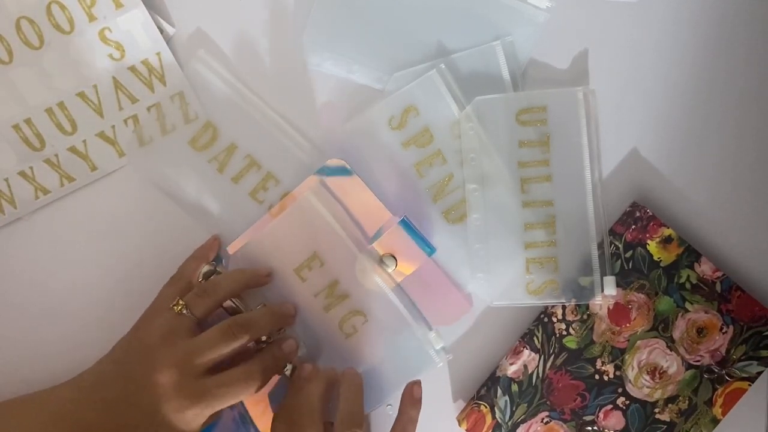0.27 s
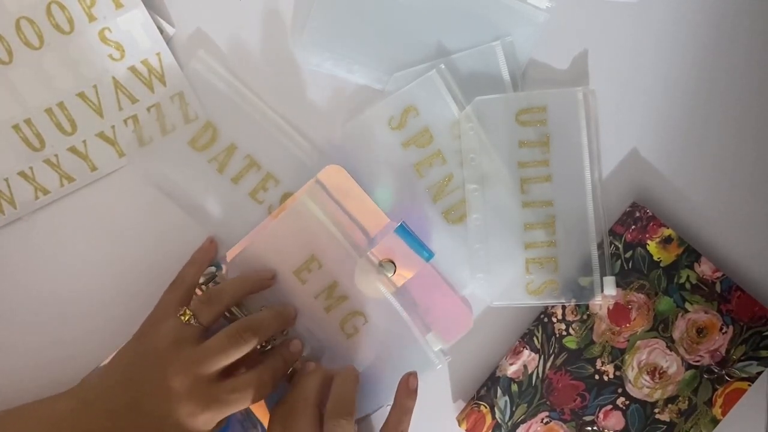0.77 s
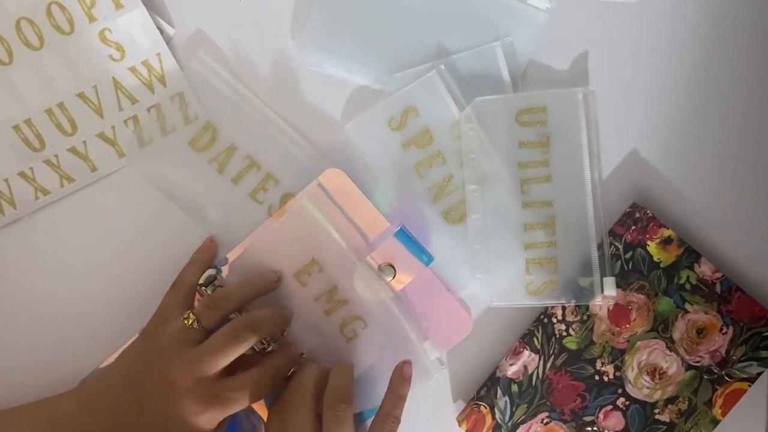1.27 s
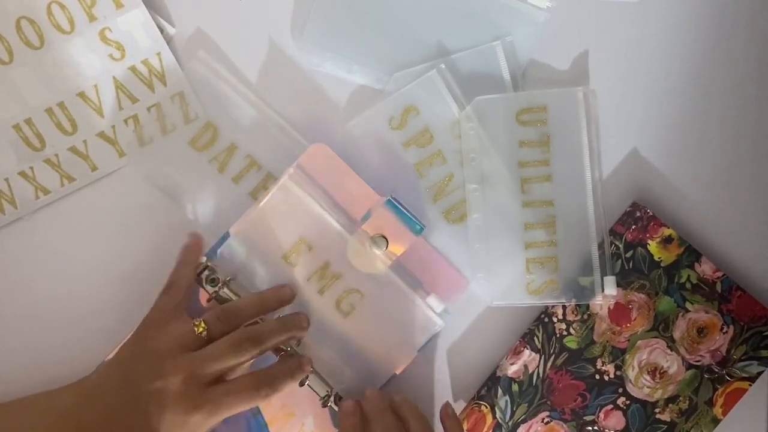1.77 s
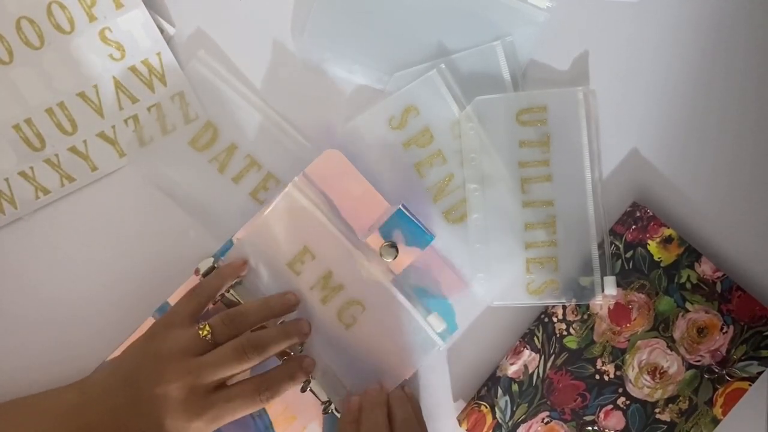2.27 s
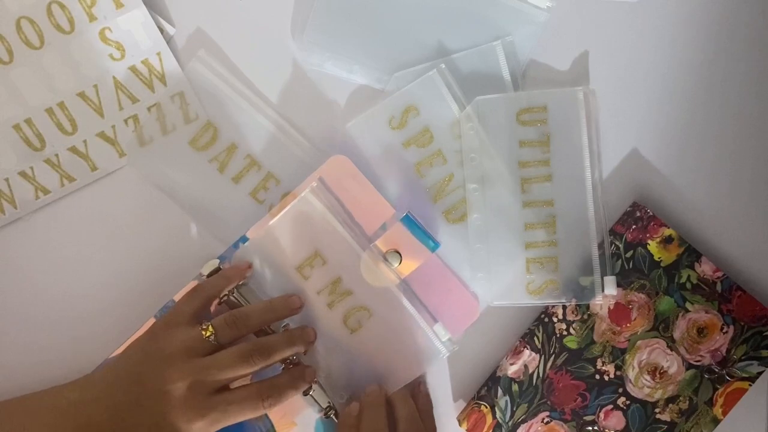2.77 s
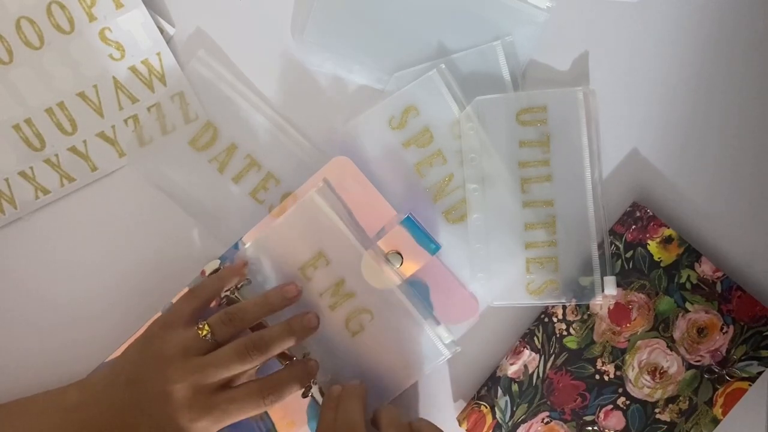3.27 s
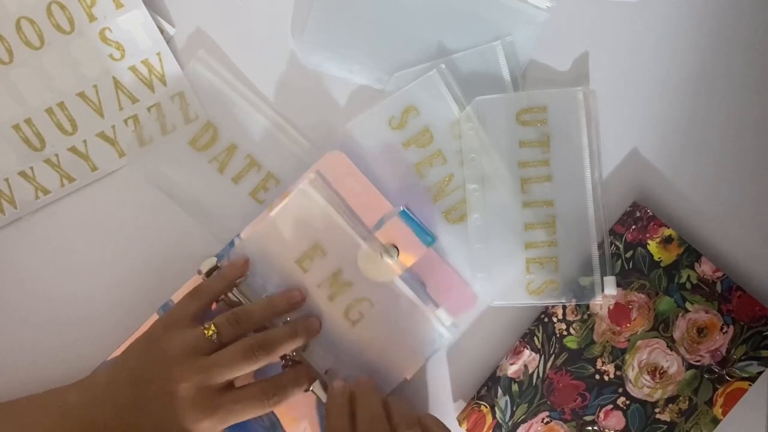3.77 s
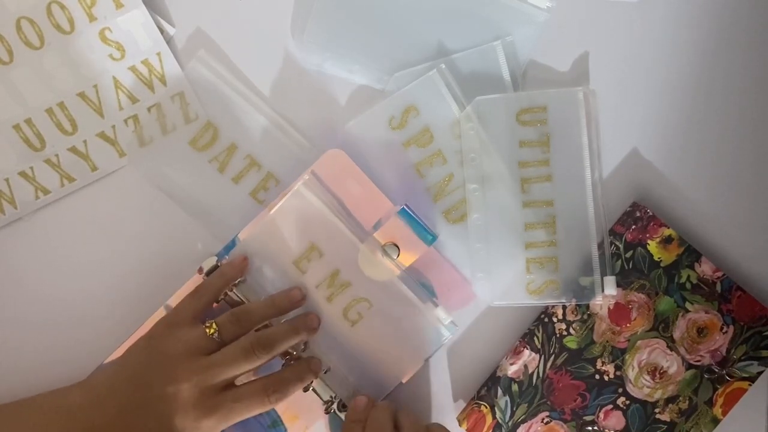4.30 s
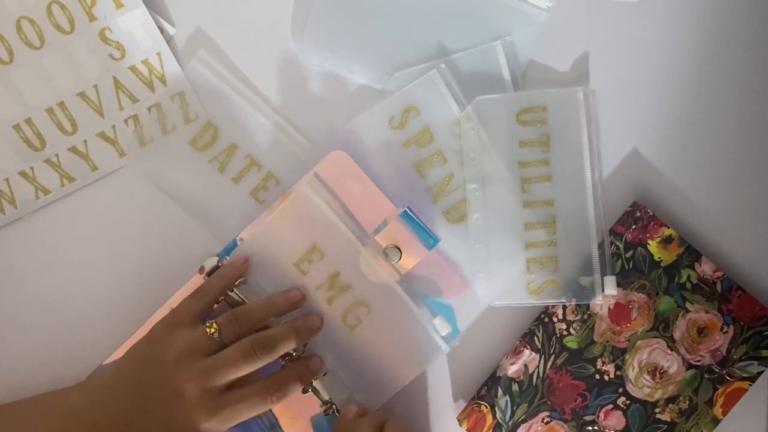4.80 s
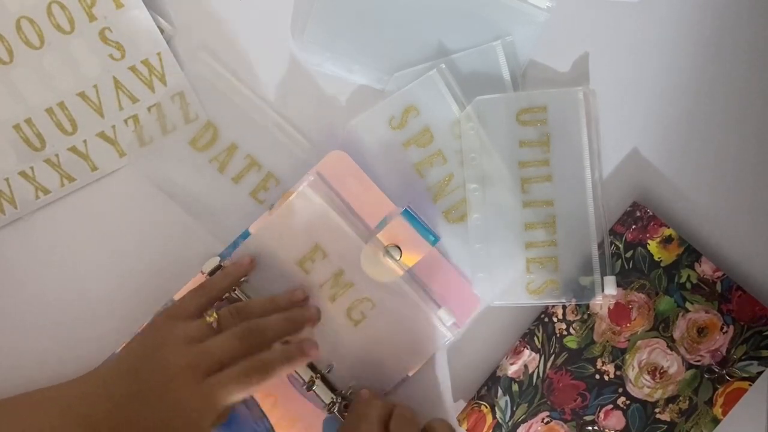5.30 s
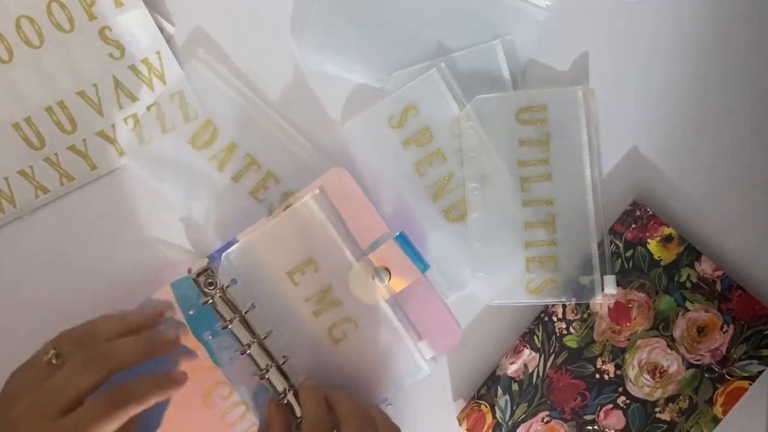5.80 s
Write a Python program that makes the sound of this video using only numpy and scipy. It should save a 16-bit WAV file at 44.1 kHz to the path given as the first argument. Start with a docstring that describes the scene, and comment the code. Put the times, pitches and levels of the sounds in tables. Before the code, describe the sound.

Very close, dry handling of stiff clear plastic on metal binder rings over a table, indoors. Small clicks and a stuttering creak build to one hard, bright clack that jolts the cover and table. A dense burst of crinkling ticks follows, then sparse rustles and taps, a gentler snap, near-quiet, and finally clustered ticks with rough edge scrapes. Low room hum stays underneath.

```python
"""A quiet room with a low wavering hum, and a close two-port microphone by a small binder on a table.
Hands fit clear plastic envelopes onto its metal rings: first come ticks, a dragging creak and harder slips.
At 1.15 s the rings snap shut loudly, cover and table knock, and the binder drops back; sheets rustle and tick.
A softer snap follows at 3.44 s, then taps and hoarse edge scrapes from 4.6 s until about 6.1 s.
Filtered noise makes the rubbing and cracks, decaying modes the binder, and short sines the sheet edges."""
import sys
import numpy as np
from scipy import signal
from scipy.fft import rfft, irfft, next_fast_len
from scipy.io import wavfile
from scipy.ndimage import uniform_filter1d

SR = 44100
rng = np.random.default_rng(int(sys.argv[2]) if len(sys.argv) > 2 else 0)


def to_wav(s):
    """Save 16-bit WAV."""
    ch = np.atleast_2d(s).T  # columns
    pcm = np.round(np.clip(ch, -1, 1) * 32767)  # PCM
    wavfile.write(sys.argv[1], SR, pcm.astype(np.int16))


N = 266805
TIME = np.arange(N) / SR
BLOW_TIME = TIME[:SR // 6]  # the span of one contact sound


def undb(db):
    """Decibels to gain."""
    return 10 ** (np.asarray(db) / 20)


def unit(x):
    """Scale to rms 1."""
    return x / np.sqrt(np.mean(x ** 2))


def unit_peak(x, size=132):
    """Scale so that the loudest 3 ms have rms 1."""
    return x / np.sqrt(uniform_filter1d(x ** 2, size, mode="constant").max())


def t60_decay(age, t60_s):
    """Exponential decay that falls by 60 dB in t60_s."""
    return np.exp(-np.log(1000) * age / t60_s)


def blow_noise():
    """A fresh stretch of random force, as long as one contact sound."""
    return rng.standard_normal(len(BLOW_TIME))


def log_curve(points, hz):
    """Read (Hz, value) points on a log-frequency axis."""
    point_hz, value = np.transpose(points)
    return np.interp(np.log(hz + 1), np.log(point_hz), value)


def colour(x, points):
    """Causal minimum-phase filter with the given (Hz, dB) response."""
    log_gain = log_curve(points, np.fft.rfftfreq(2048, 1 / SR)) * np.log(10) / 20
    cepstrum = irfft(log_gain)
    # fold the cepstrum onto positive time, so the filter does not sound early
    cepstrum[1:1024] *= 2
    cepstrum[1025:] = 0
    response = irfft(np.exp(rfft(cepstrum)))
    return signal.fftconvolve(x, response)[:len(x)]


def band(x, lo_hz, hi_hz, order=3):
    """Causal band-pass."""
    edges_hz = [lo_hz, min(hi_hz, .45 * SR)]
    return signal.sosfilt(signal.butter(order, edges_hz, "band", fs=SR, output="sos"), x)


def walk(rate):
    """Slow chance with a spread near 1, from about rate random steps per second."""
    k = int(SR / rate)
    steps = np.repeat(rng.standard_normal(N // k + 1), k)
    return unit(uniform_filter1d(uniform_filter1d(steps, k), k)[:N])


def add(out, s, x):
    """Mix a sound in at time s."""
    i = max(int(s * SR), 0)
    out[i:i + len(x)] += x[:max(N - i, 0)]


# colour of the room noise: pitch_hz, level_db
ROOM_COLOUR = [(10, -32), (25, -21), (42, -14), (65, -6), (90, -6.5), (130, -9.5), (200, -12.5), (300, -24),
               (500, -30), (900, -34), (1500, -39.5), (3000, -45), (6000, -54), (15500, -63)]


def background(rumble_db=-61.5, side_db=-23, hum_hz=63.0, hum_db=-63):
    """Low room noise with a wavering hum; only the bass is alike on both sides."""
    mid = unit(colour(rng.standard_normal(N), ROOM_COLOUR)) * undb(rumble_db + 1.2 * walk(6.0))
    side = unit(colour(rng.standard_normal(N), ROOM_COLOUR))
    side = colour(side, [(150, side_db), (500, 1), (2000, 0.5)]) * undb(rumble_db)
    phase = 2 * np.pi * np.cumsum(hum_hz * (1 + 0.03 * walk(7))) / SR
    waver_db = 2.5 * walk(7)
    hum = undb(hum_db + waver_db) * unit(np.sin(phase) + 0.74 * np.sin(2 * phase))
    return mid + hum + np.array([side, -side])


def room(x, early_db=-18, early_t60=0.1, late_db=-24, late_t60=0.19):
    """Table and near objects scatter first; a longer, quieter tail from the walls follows."""
    t = TIME[:SR // 2]
    onset = np.clip((t - .002) / 0.0035, 0, 1)
    reflection_colour = [(110, -10.0), (300, 7.0), (650, 10.5), (1500, 12.5), (5000, 7.0), (13000, 3)]
    out = []
    for early, late in rng.standard_normal((2, 2, len(t))):
        early = early * onset * t60_decay(t, early_t60)
        late = late * onset * t60_decay(t, late_t60)
        response = undb(early_db) * early / np.linalg.norm(early)
        response = response + undb(late_db) * late / np.linalg.norm(late)
        out.append(signal.fftconvolve(x, colour(response, reflection_colour))[:N])
    return np.array(out)


# phase by which the left microphone port leads: pitch_hz, lead_radians
PORT_PHASE = [(0, 0), (550, -.15), (800, .9), (1100, -.4), (1750, -.5), (2400, .5), (3000, 2.1),
              (4200, 1.1), (5600, .4), (6200, .9), (7800, 3.1), (8400, 3.2), (11000, 6.2), (11900, 6.4),
              (13200, 7.8), (14000, 9.3), (16000, 9.5)]
# left port minus right port: pitch_hz, level_db
PORT_BALANCE = [(80, -.4), (300, -2.4), (600, -3), (800, -5), (1300, 0), (2400, -3), (4400, -1), (6000, 1),
                (9000, 0)]


def ports(x):
    """The two microphone ports hear one source with unequal phase and level."""
    size = next_fast_len(N + SR // 4)
    hz = np.fft.rfftfreq(size, 1 / SR)
    phase = np.interp(hz, *np.transpose(PORT_PHASE))
    # each port takes half of the difference
    half = np.exp(.5j * phase) * undb(log_curve(PORT_BALANCE, hz) / 2)
    return irfft(rfft(x, size) * np.array([half, 1 / half]), size)[:, :N]


# binder on the table, seven cover modes and then the ring spine: pitch_hz, level_db, t60_s
MODES = [(170, -17, 0.22), (251, -11, 0.1), (299.6, 2, 0.11), (452.9, 1, 0.06), (503, -8, 0.015),
         (640, -8, 0.075), (833, -9.5, 0.038), (974, -13.5, .07), (1107, -17, 0.035), (1186, -18.5, 0.027),
         (1445, -3, .052), (1570, -16, .05), (1654, -11.5, 0.04), (1792, -10, 0.041), (1899, -13, 0.04),
         (2266, -9, 0.045), (2450, -5.5, 0.018), (2970, -10.5, 0.024), (4100, -13, 0.037),
         (5240, -10, 0.025), (5700, -14, 0.028)]


def binder(modes, detune, spread_db, travel_s):
    """Modes after one blow; bending waves are slower at low pitch, so the thump comes late."""
    hz, db, t60 = np.transpose(modes)[:, :, None]
    pitch, size = rng.standard_normal((2, len(modes), 1))
    # travel_s is the delay of the first mode given
    age = np.maximum(BLOW_TIME - travel_s * np.sqrt(hz[0] / hz), 0)
    ringing = np.sin(2 * np.pi * hz * (1 + detune * pitch) * age) * t60_decay(age, t60)
    return -np.sum(undb(db + spread_db * size) * ringing, axis=0)


# colour of surfaces striking close to the microphone: pitch_hz, level_db
CRACK = [(200, -24.5), (900, -10.5), (1500, 3), (2300, -6), (3200, 0.5), (4200, 1.5), (5500, -5),
         (6500, -10), (7600, -7.5), (10000, -10.5), (13000, -10), (15700, -16.5)]


def contact(decay_s, chatter, rise_s=.0003):
    """A push followed by brief chatter of the two surfaces."""
    swell = (1 - np.exp(-BLOW_TIME / rise_s)) * np.exp(-BLOW_TIME / decay_s)
    push = chatter * blow_noise() * swell
    push[0] += 1
    return colour(push, CRACK)


SETTLE_S, SETTLE_DB = 1.2245, -40


def settle(lo_hz=200, hi_hz=380, decay_s=.008):
    """The binder drops back on the table after the hard snap."""
    out = np.zeros(N)
    knock = binder(MODES[:7], 0, 0, travel_s=0.0015) * np.exp(-BLOW_TIME / decay_s)
    thud = band(knock, lo_hz, hi_hz, order=1)
    add(out, SETTLE_S, undb(SETTLE_DB) * unit_peak(thud))
    return out


# a taut sheet edge scraping along, its pitch moving as it bends:
# start_s, length_s, first_pitch_hz, last_pitch_hz, level_db
EDGE_SCRAPES = [(1.478, .075, 1400, 1786, -52), (2.578, .15, 1400, 2300, -70.5),
                (3.633, 0.081, 1350, 1657, -57.5), (5.334, 0.046, 3500, 3300, -50.5),
                (5.554, .09, 3000, 2100, -65.5), (5.676, 0.0513, 4400, 4770, -71),
                (5.774, 0.13, 6560, 6880, -58), (6.014, 0.047, 3200, 2860, -59)]


def edge_scrapes(width_hz=750, rough_db=2):
    """One broad resonance of the bent sheet, fed by friction, swells and glides with each scrape."""
    out = np.zeros(N)
    friction = rng.standard_normal(N) + 1j * rng.standard_normal(N)
    lowpass = signal.butter(2, width_hz / 2, fs=SR, output="sos")
    wobble = signal.sosfilt(lowpass, friction) * undb(rough_db * walk(90))
    for start, length, first_hz, last_hz, db in EDGE_SCRAPES:
        span = (TIME > start) & (TIME < start + length)
        share = (TIME[span] - start) / length
        phase = 2 * np.pi * np.cumsum(first_hz * (last_hz / first_hz) ** share) / SR
        song = unit(np.real(wobble[span] * np.exp(1j * phase)))
        add(out, start, undb(db) * song * np.sqrt(np.sin(np.pi * share)))
    return out


def slip(lo_hz, body_hz, tick_hz, tick_db, release_db=-10):
    """One jerk: a tiny sharp click as the sheet lets go, then a dull tick that knocks the binder."""
    body = binder(MODES, detune=0.033, spread_db=.5, travel_s=0.0011) * np.exp(-BLOW_TIME / 0.045)
    body = band(band(body, lo_hz, body_hz, order=1), 150, 3600)
    tick = band(contact(decay_s=0.0027, chatter=0.94), 450, tick_hz, order=2)
    release = band(contact(decay_s=.0004, chatter=1.0), 1300, 6000, order=2)
    return unit_peak(body) + undb(tick_db) * unit_peak(tick) + undb(release_db) * unit_peak(release)


# single harder slips as the rings are squeezed: start_s, level_db
SLIPS = [(.377, -65), (0.391, -58.5), (0.9143, -50.5), (.943, -49.5), (1.034, -45), (1.0801, -43.5)]
# a sheet dragged by jerks along a ring, one curve for each pull: time_s, slips_per_s, level_db
CREAKS = [
    [(.453, 66.6, -60), (0.528, 44.5, -55), (0.555, 85, -54), (0.616, 97, -52), (0.679, 57, -50)],
    [(1.479, 130, -46), (1.51, 165, -48.5), (1.553, 117, -48.5)],
]


def creak(scatter_db=1.3, note_hz=2350, note_db=-6, note_s=0.0035):
    """Stick and slip: runs of uneven little jerks, and a few harder single ones."""
    out = np.zeros(N)
    for s, db in SLIPS:
        # a hard slip also sets the squeezed ring sounding for a moment
        note = band(contact(decay_s=note_s, chatter=.5), note_hz / 1.12, note_hz * 1.12, order=2)
        jerk = slip(lo_hz=514, body_hz=1310, tick_hz=1800, tick_db=-6.5, release_db=-17)
        add(out, s, undb(db + note_db) * unit_peak(note))
        add(out, s, undb(db) * jerk)
    for pull in CREAKS:
        times, rates, levels = np.transpose(pull)
        s = times[0]
        while s < times[-1]:
            size = undb(np.interp(s, times, levels) + scatter_db * rng.standard_normal())
            jerk = slip(lo_hz=366, body_hz=820, tick_hz=960, tick_db=-5.5, release_db=-11.5)
            add(out, s, size * jerk)
            s += np.exp(.03 * rng.standard_normal()) / np.interp(s, times, rates)
    return out


def bent(x, spread_db):
    """The sheet is bent differently every time, which moves its resonances."""
    hz = np.geomspace(700, 15000, 56)
    return colour(x, np.column_stack([hz, spread_db * rng.standard_normal(len(hz))]))


STROKE_EASE_DB = 10.5  # a stroke is this much softer at its ends than at its fastest


def stroke_speed(share, gather):
    """Each stroke gathers speed and slows down again; share is how much of it has passed."""
    slowness = np.interp(share, [0, np.clip(gather, .02, .98), 1], [1, 0, 1])
    return undb(-STROKE_EASE_DB * slowness ** 2)


# strokes of sheet over sheet: start_s, length_s, gather (share of the length spent gathering speed),
# strength_db, brightness_db, rub_db (cover rub over the stroke), crinkle_db (crinkles over the stroke)
STROKES = [(0.534, 0.43, 0.38, -70.5, -1, 0.5, 4), (1.269, 0.17, 0.25, -60, -2.5, 0, 6),
           (1.47, 0.083, 1, -45.5, -1.5, -1.5, -2), (1.575, 0.069, 0.11, -47, -4.5, 3, 0),
           (1.66, 0.19, .06, -76, 2.5, 4.5, 6), (1.889, 0.073, 0.38, -69.5, 3.5, -11, 14),
           (2, 0.099, 0.072, -73.5, 6, -9, 14), (2.126, 0.18, 0.66, -70.5, -4, -2.5, 6),
           (2.449, 0.13, 0.31, -71.5, -4, 1.5, 7.5), (2.568, 0.16, 0.77, -64.5, -5.5, 0, 8.5),
           (2.724, 0.084, 0.054, -66.5, 1.5, 3.5, 3.5), (2.874, 0.096, 0.57, -65.5, -6.5, -2, -5),
           (2.958, 0.036, 0.91, -55.5, -3.5, 8, 1), (3.036, 0.18, 0.8, -72.5, -5, 3, 0),
           (3.578, 0.2, 0.56, -57, -5.5, 2, 3), (3.87, 0.28, 0.47, -75.5, -2, -7, 4.5),
           (4.617, 0.032, 0.11, -58.5, -5, 1.5, -2.5), (4.659, 0.1, 0.57, -73.5, -5, 3, 4),
           (4.839, 0.068, 0.04, -73, -1.5, 1, 7), (4.957, 0.19, 0.49, -72, -9, -2, 10),
           (5.183, 0.18, 0.4, -66.5, 1.5, 2.5, 2), (5.337, 0.043, 0.85, -47.5, -2.5, -3.5, 5),
           (5.372, 0.12, 0.08, -69, 1.5, 14, -3), (5.526, 0.22, 0.36, -64.5, 2.5, 6, 1.5),
           (5.766, 0.11, 0.35, -61.5, 1, 10.5, 0), (5.846, 0.1, 0.54, -57, 0.5, 9.5, 0.5),
           (6.017, 0.048, 0.069, -67, 19, 15, -3)]
# a stroke of plain brightness, one row each for rustle, swish and fine hiss:
# level_db, brightness_share
STROKE_MIX = [(0.5, 0.12), (0.55, 1), (-5.5, 0.91)]
# colours of the droning cover, the rustle, the swish and the fine hiss: pitch_hz, level_db
RUB = [(60, -30), (180, -8), (240, -6), (295, 4), (390, -7.5), (480, 0), (620, -15.5), (900, -15.5),
       (1600, -46), (5000, -48)]
RUSTLE = [(400, -20.5), (800, -7.5), (1200, 2), (1700, 0.5), (2300, -1.5), (3100, -9), (5000, -3),
          (12000, -64.5)]
SWISH = [(1000, -37), (2200, -10.5), (2900, 0), (3400, -1), (4400, -4.5), (5400, -2), (6700, -6),
         (7800, -12), (9500, -9.5), (16000, -44.5)]
HISS = [(2000, -42), (6000, -10), (8000, -3.5), (10000, 1), (13000, -5), (15700, -3)]


def strokes(taper_s=0.052, grain_rate=900, grain_db=3.0, smooth=0.69, ragged_db=2.25, bend_db=1.5):
    """Film slides on film: countless tiny catches over a smooth hiss, with the cover droning beneath."""
    sizes = undb(grain_db * np.minimum(rng.exponential(size=N), 4.5)) * rng.choice([-1, 1], N)
    catches = unit(sizes * (rng.random(N) < grain_rate / SR))
    layers = []
    for points in (RUB, RUSTLE, SWISH, HISS):
        friction = unit(colour(catches + smooth * rng.standard_normal(N), points))
        layers.append(undb(ragged_db * walk(70)) * friction)
    layers = np.array(layers)
    out = np.zeros(N)
    plain_db, by_edge = np.transpose(STROKE_MIX)
    for start, length, gather, db, bright_db, rub_db, _ in STROKES:
        span = (TIME > start - taper_s) & (TIME < start + length + taper_s)
        age = TIME[span] - start
        # the sheets come into touch as the stroke begins and part as it ends
        meeting = np.clip(age / (0.43 * max(gather * length, .004)) + 0.76, 0, 1)
        parting = np.clip((length - age) / (2 * taper_s) + .5, 0, 1)
        gains = undb(db + np.append(rub_db, plain_db + by_edge * bright_db))
        sliding = gains @ layers[:, span]
        moving = sliding * stroke_speed(age / length, gather) * meeting * parting
        add(out, start + age[0], bent(moving, bend_db))
    return out


# how firmly the hand couples the sheets to the cover, which lets ticks knock: time_s, press_db
PRESS = [(0, 4.5), (.72, -6.5), (1.33, -4), (1.58, -6.5), (1.75, -17), (2.68, -18), (2.92, -20),
         (2.99, -18), (3.13, -0.5), (3.45, 5), (3.62, -6), (3.76, -14), (4.6, -16.5), (5.2, -0.5),
         (5.36, -28)]


def mix(parts, s, db, bright_db):
    """Gain of each part of a contact: a sharp edge lifts the treble, a firm hand brings in the cover."""
    plain_db, by_edge, by_press = np.transpose(parts)
    press_db = np.interp(s, *np.transpose(PRESS))
    return undb(db + plain_db + by_edge * bright_db + by_press * press_db)


# bands of cover knock, sheet clack, edge tick and fine crackle: low_hz, high_hz
BAND_EDGES = [(240, 750), (700, 2800), (2800, 7500), (8000, 15800)]
# soft plastic stops ringing almost at once, and the hand damps the binder (exponential decay time)
EDGE_T60_S, HAND_DAMP_S = .008, .018


def flick(hz, ring_db=-7, flutter_db=-15, flutter_s=0.0089, bend_db=4.5, edge_db=-3, click_db=-5):
    """A sheet edge flicks on a ring: crack, short note, film flutter and binder's answer, band by band."""
    flutter = colour(blow_noise() * np.exp(-BLOW_TIME / flutter_s), CRACK)
    crack = contact(decay_s=0.000982, chatter=3.2, rise_s=0.00068)
    film = unit_peak(crack) + undb(flutter_db) * unit_peak(flutter)
    edge = np.sin(2 * np.pi * hz * BLOW_TIME) * t60_decay(BLOW_TIME, EDGE_T60_S)
    body = binder(MODES, detune=0.091, spread_db=2.0, travel_s=.0013) * np.exp(-BLOW_TIME / HAND_DAMP_S)
    click = band(contact(decay_s=.0003, chatter=0.65), 3300, 19000, order=1)
    blow = unit_peak(bent(film, bend_db)) + undb(click_db) * unit_peak(click)
    blow = blow + undb(edge_db) * unit_peak(edge) + undb(ring_db) * unit_peak(body)
    return np.array([unit_peak(band(blow, *edges)) for edges in BAND_EDGES])


# stray crinkles while a sheet moves, at most eight a stroke: per second, half-range in dB, brightness in dB
CRINKLE_RATE, CRINKLE_SPREAD_DB, CRINKLE_BRIGHT_DB = 30, 2.5, -3.5


def crinkles(middle_hz=1700):
    """Faint flicks at random moments of each stroke, strongest at full speed, too light to knock the cover."""
    out = np.zeros(N)
    for start, length, gather, db, bright_db, _, crinkle_db in STROKES:
        for share, size, pitch in rng.random((8, 3))[:int(CRINKLE_RATE * length)]:
            level_db = db + crinkle_db + CRINKLE_SPREAD_DB * (2 * size - 1)
            gains = mix(TICK_MIX, start, level_db, bright_db + CRINKLE_BRIGHT_DB)
            # leave out the first band, the cover knock
            crinkle = gains[1:] @ flick(middle_hz * 2 ** (pitch - .5))[1:]
            add(out, start + share * length, stroke_speed(share, gather) * crinkle)
    return out


# plastic ticks and taps: start_s, strength_db, brightness_db, pitch_hz (note of the flicked edge)
TICKS = [(0.115, -68.5, -3, 1770), (0.197, -60.5, -1.5, 1420), (0.2171, -40.5, -3, 1920),
         (0.2214, -47.5, -6, 1330), (0.232, -78, 24, 3600), (0.41, -57.5, -20, 1440),
         (0.725, -45.5, -11, 1950), (0.99, -58.5, -11, 2300), (1.257, -54, -6.5, 1790),
         (1.318, -41, -7, 1530), (1.327, -57, 2, 2400), (1.339, -51.5, 5, 2240), (1.378, -63, 11, 3600),
         (1.406, -52.5, 2, 1700), (1.4248, -46.5, 6, 4370), (1.447, -57, 2, 2630),
         (1.462, -47.5, -10, 2260), (1.48, -52, 6, 1560), (1.496, -46, -7, 1670), (1.516, -50, 12, 1690),
         (1.5396, -50, 12, 2000), (1.5766, -36.5, 4, 4000), (1.607, -47.5, 23, 6300),
         (1.624, -51, 10, 1530), (1.664, -54.5, 8.5, 3430), (1.767, -66, 10, 1417), (1.998, -54.5, 6, 3400),
         (2.184, -39, -4, 1525), (2.193, -64, -8, 1410), (2.243, -63.5, 8.5, 1112),
         (2.454, -61.5, 4.5, 1538), (2.504, -62, -11, 1470), (2.621, -58, -12, 1246), (2.646, -48, 2, 2280),
         (2.724, -47, -14, 1750), (2.751, -45.5, -2.5, 3700), (2.839, -71, 11, 1430),
         (2.898, -52.5, -25, 1766), (2.913, -54.5, -10, 1356), (2.957, -46, -9, 1390),
         (2.98, -53.5, -1.5, 1348), (3.014, -55, -29, 1430), (3.108, -62, -7, 1475),
         (3.1298, -41, 1.5, 2230), (3.397, -63.5, -13, 1690), (3.41, -61.5, -3.5, 1360),
         (3.432, -61, 0, 3600), (3.447, -36, 2.5, 1440), (3.599, -65, 6, 4280), (3.623, -38, -3.5, 1394),
         (3.643, -50.5, 4, 1530), (3.683, -49, -13, 1570), (3.756, -47.5, 9, 4090), (4.249, -74, 10, 3456),
         (4.607, -48.5, -5.5, 1683), (4.6104, -43.5, -8, 1657), (4.616, -76, 21, 3000),
         (4.621, -51, -9, 1450), (4.629, -53, -19, 2980), (4.733, -59.5, -4, 1624), (4.841, -55, -21, 1840),
         (4.848, -64.5, 7, 2090), (4.876, -62, 4, 1550), (4.967, -62, -20, 1417), (4.996, -63.5, -6, 1890),
         (5.033, -61.5, 1.5, 1426), (5.054, -60, 0, 1930), (5.104, -60, -20, 1860),
         (5.113, -61.5, 12.5, 4700), (5.127, -61, 12, 5940), (5.139, -55.5, 0, 1880),
         (5.154, -59.5, 12, 2290), (5.164, -57, 0, 1430), (5.178, -65, 9, 2400), (5.2, -61, 2, 1480),
         (5.228, -52.5, -15, 1700), (5.237, -42.5, -10, 1780), (5.245, -53, -16, 1600),
         (5.284, -60, 13.5, 1730), (5.307, -60, 12, 5510), (5.33, -52, 8, 3470), (5.336, -40.5, 3.5, 3520),
         (5.352, -70, 21, 3396), (6.017, -59, 7, 3200)]
# a tick of plain brightness, one row each for cover knock, sheet clack, edge tick and fine crackle:
# level_db, brightness_share, press_share
TICK_MIX = [(-2, 0.039, 0.95), (-0.5, 0.063, 0.0039), (-1.5, 0.59, 0.0031), (-10, 1, 0.21)]


def ticks():
    """The distinct ticks and taps of sheet edges on the rings."""
    out = np.zeros(N)
    for s, db, bright_db, hz in TICKS:
        add(out, s, mix(TICK_MIX, s, db, bright_db) @ flick(hz))
    return out


def cover_slap(hz=390, t60=.032, late_s=.0019):
    """The cover hits the table in one heavy swing that dies at once."""
    age = np.maximum(BLOW_TIME - late_s, 0)
    return -np.sin(2 * np.pi * hz * age) * t60_decay(age, t60)


def snap_crack(hz, bright_db, focus_db):
    """Hard metal contact chatters for a moment and holds all pitches evenly before it is coloured."""
    chatter = rfft(blow_noise() * BLOW_TIME * np.exp(-BLOW_TIME / .0008))
    even = irfft(chatter / np.abs(chatter), len(BLOW_TIME))
    force = even * np.exp(-BLOW_TIME / 0.0026)
    crack_colour = [(300, -14.5), (1100, -9.5), (2300, 4.0 + 0.58 * bright_db), (3200, -2.5), (4400, -9.0),
                    (7500, bright_db - 9.0), (10000, bright_db - 6.5), (15500, bright_db - 18.5)]
    focus = band(force, hz / 1.14, hz * 1.14, order=2)
    return unit_peak(colour(force, crack_colour)) + undb(focus_db) * unit_peak(focus)


def snap_thump(slap_db, shudder_db):
    """The cover rings and slaps the table, and the binder shudders there after the blow."""
    cover = unit_peak(binder(MODES[:7], 0, 0, travel_s=0.0026))
    knock = unit_peak(cover + undb(slap_db) * unit_peak(cover_slap()))
    shudder = band(blow_noise(), 240, 370, order=3) * np.exp(-BLOW_TIME / SHUDDER_S)
    return knock + undb(shudder_db) * unit_peak(shudder)


# ring snaps: start_s, scrape_length_s (lead-in scrape), scrape_db, crack_db, crack_pitch_hz,
# brightness_db, thump_db (cover), ring_db (metal)
SNAPS = [(1.1472, .003, -17.5, -12, 5278, 2.5, -9, -20),
         (3.4401, .0015, -47, -25.5, 3589, -15.5, -24.5, -29.5)]
# exponential decay times: the binder's shudder, and the rings choked by the fingers that stay on them
SHUDDER_S, RING_CHOKE_S = .022, .028


def snaps(swell_db=13, focus_db=-3, rattle_db=-14, rattle_s=0.0093, shudder_db=-20, slap_db=1):
    """The ring tips scrape past each other, crack home, and set the spine and cover ringing."""
    out = np.zeros(N)
    for s, scrape_s, scrape_db, crack_db, hz, bright_db, thump_db, ring_db in SNAPS:
        swell = undb(-swell_db * np.maximum(1 - BLOW_TIME / scrape_s, 0))
        scrape = colour(blow_noise() * (BLOW_TIME < scrape_s) * swell, CRACK)
        crack = unit_peak(snap_crack(hz, bright_db, focus_db))
        rattle = band(blow_noise(), 1000, 2100, order=2) * np.exp(-BLOW_TIME / rattle_s)
        ring = binder(MODES[7:], 0, 0, travel_s=0.00061) * np.exp(-BLOW_TIME / RING_CHOKE_S)
        add(out, s - scrape_s, undb(scrape_db) * unit_peak(scrape))
        add(out, s - .0006, undb(crack_db) * (crack + undb(rattle_db) * unit_peak(rattle)))
        add(out, s, undb(thump_db) * snap_thump(slap_db, shudder_db))
        add(out, s, undb(ring_db) * unit_peak(ring))
    return out


def radiate(x, lowest_hz=135):
    """The small cover sheds the bass."""
    return band(x, lowest_hz, 21000, order=2)


def scene(snap_room_db=-2, count=3):
    """All the handling comes from the binder, which is too small to radiate deep bass."""
    quiet = background()
    snap = radiate(snaps())
    # a snap rattles differently in each direction, so its echoes blend into a smooth tail
    echoes = sum(room(radiate(snaps())) for _ in range(count)) / np.sqrt(count)
    sheets = radiate(settle() + edge_scrapes() + creak() + strokes() + crinkles() + ticks())
    return ports(sheets + snap) + room(sheets) + undb(snap_room_db) * echoes + quiet


TOP_HZ = 16000


def record(dry):
    """The recorder sheds the deepest rumble, rounds the loudest peak and cuts the top."""
    dry = signal.sosfilt(signal.butter(2, 32, "high", fs=SR, output="sos"), dry)
    dry = .85 * np.tanh(dry / .85)
    return signal.sosfilt(signal.ellip(8, .2, 70, TOP_HZ, fs=SR, output="sos"), dry)


dry = scene()
out = record(dry)
to_wav(out)
```